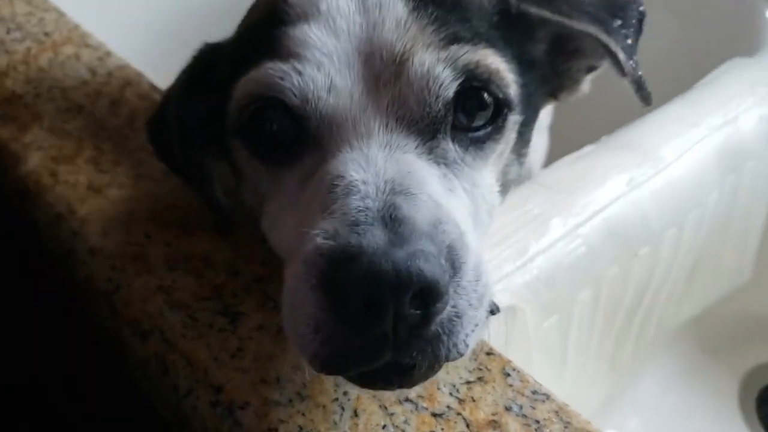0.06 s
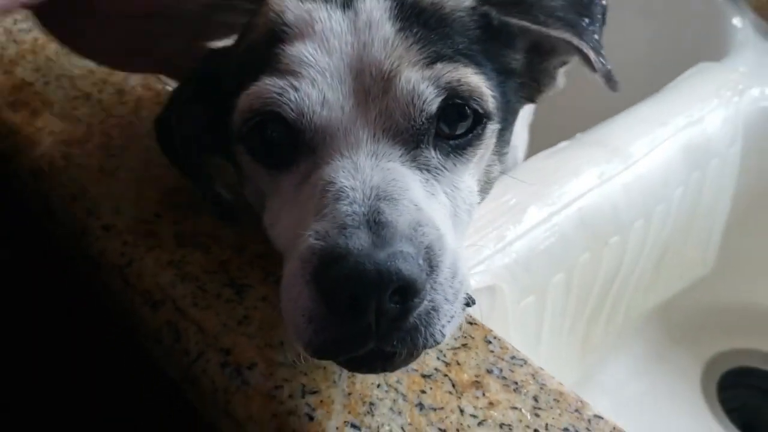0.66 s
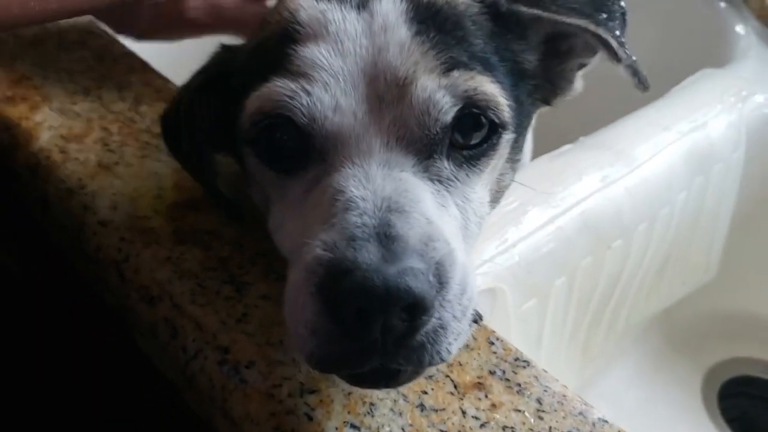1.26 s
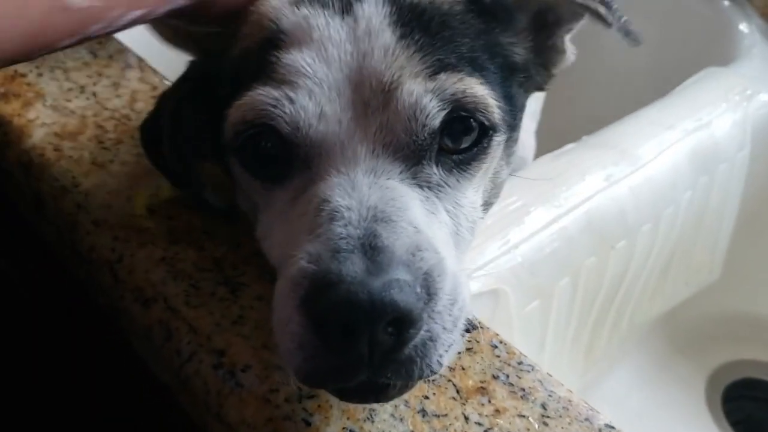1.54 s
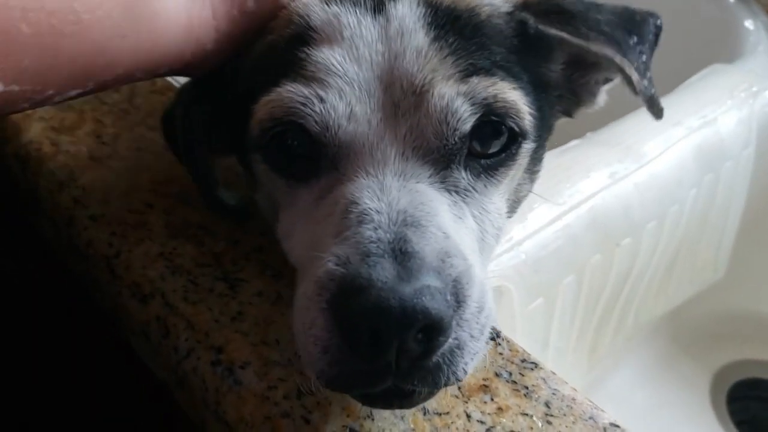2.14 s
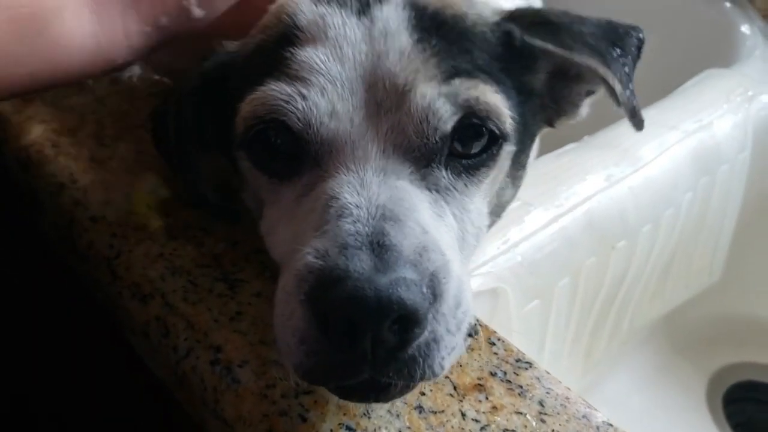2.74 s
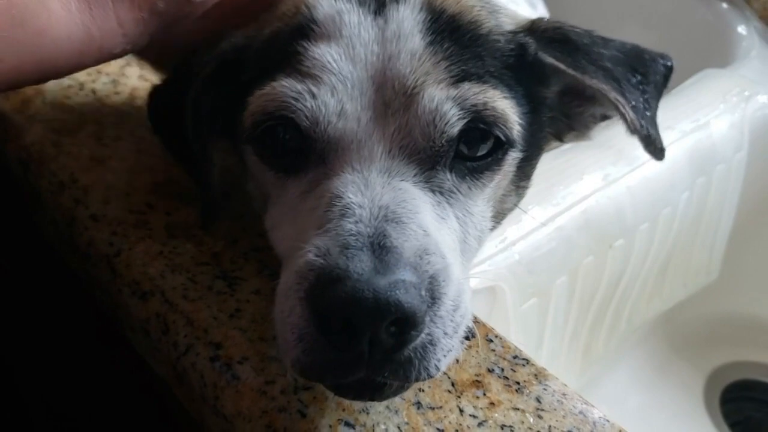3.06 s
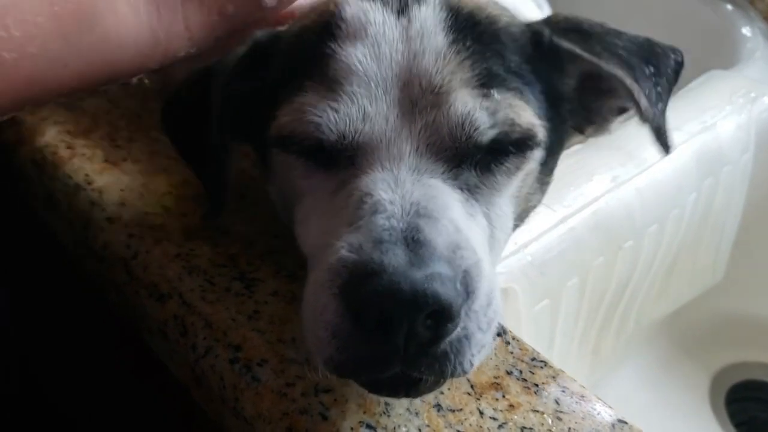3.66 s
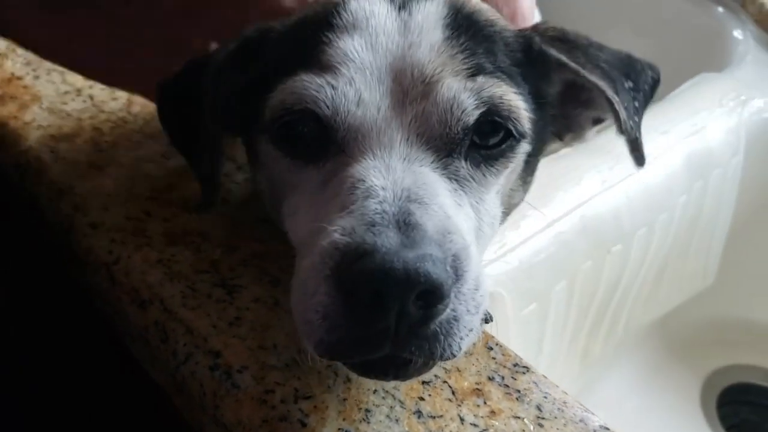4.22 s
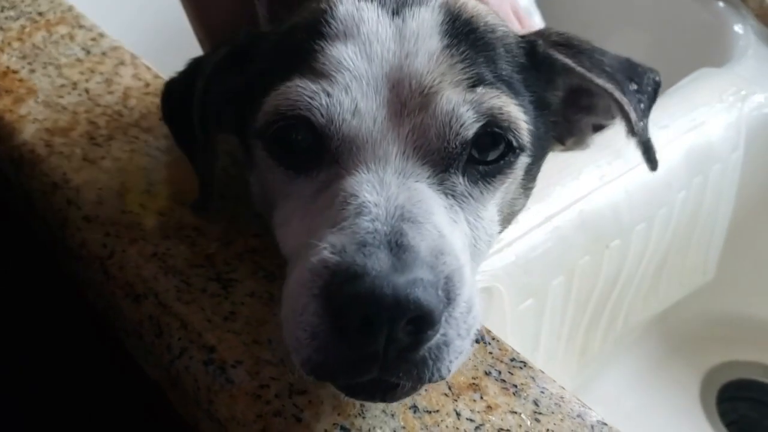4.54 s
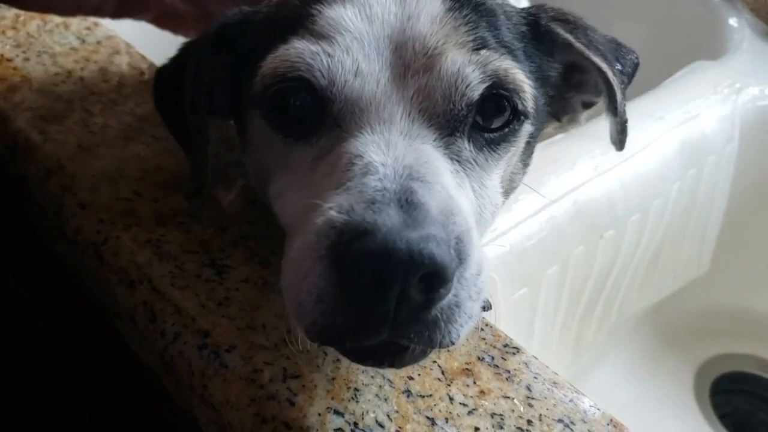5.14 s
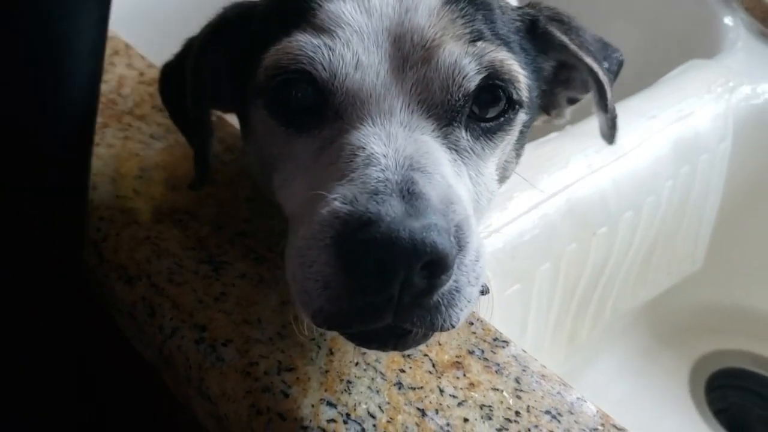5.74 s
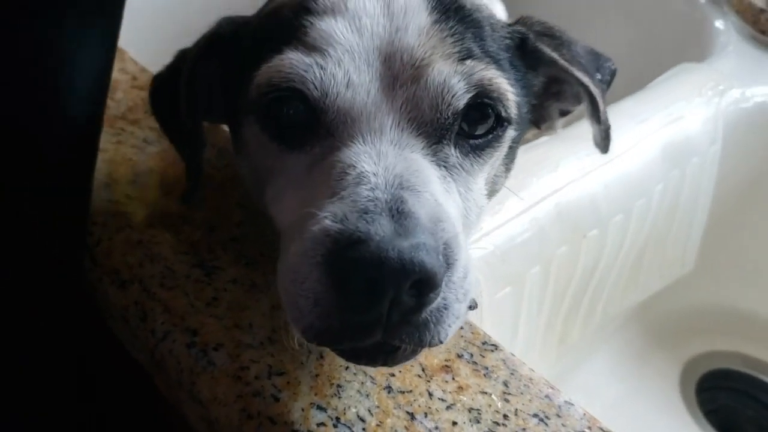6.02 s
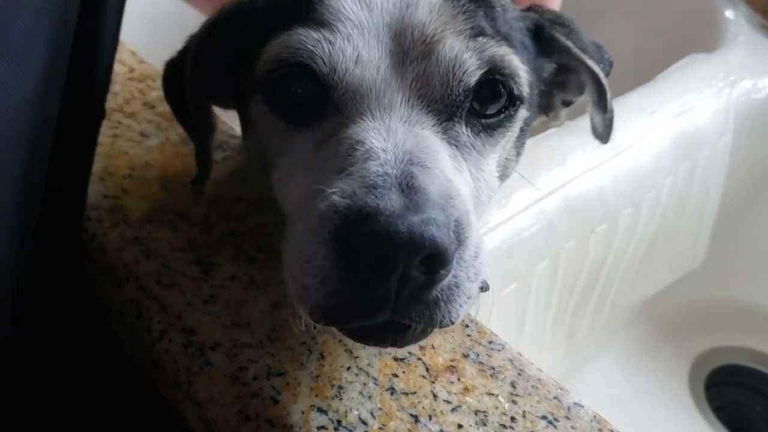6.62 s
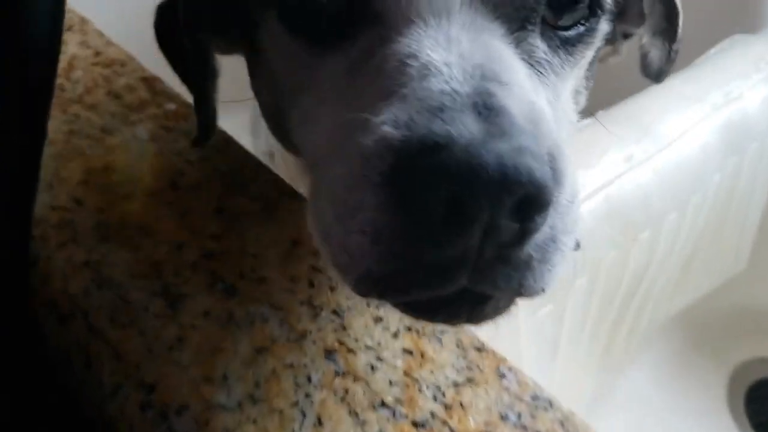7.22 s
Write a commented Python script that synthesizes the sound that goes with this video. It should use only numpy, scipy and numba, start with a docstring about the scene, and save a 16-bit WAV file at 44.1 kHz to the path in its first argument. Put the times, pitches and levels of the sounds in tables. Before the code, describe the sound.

Hands scrub lather into a wet dog in a kitchen sink, close to the microphone and mostly on the left. Each short, uneven stroke brings a hiss of wet fur, a fine fizz of bubbles and a small squelch. A low motor hum and fan drone continue throughout.

The first half second has firm rubbing, soft sink bumps and a hollow knock. Strokes continue with brief fingertip rasps, growing lighter from about 2 to 3.7 seconds, with small wet pats near 2.5 and 3.2. Firmer rubbing returns at 3.9. At 4.2 comes the loudest moment: a wet slap with a knock, a bright tick and a dull sink thud. Smaller wet snaps follow at 4.7 and 5.3. Around 6.3 the dog bumps the sink with a short, low rumble. Scrubbing goes on to about 7.5 seconds, with a light knock near 7.2. The room echo is short and faint.

```python
"""Two hands scrub lather into a wet dog standing in a kitchen sink, close to the microphone.
With each stroke, wet hairs slip past the fingers and hiss, tiny bubbles burst and fizz, and air
pockets squelch under the palms. Now and then a hand pats or knocks the coat, a film of water tears
with a tick, or the dog bumps the tub. Behind it all hum the motor and fan of a kitchen appliance."""
import sys
import numpy as np
from scipy import signal
from scipy.fft import rfft, irfft, next_fast_len
from scipy.io import wavfile
from scipy.ndimage import uniform_filter1d, map_coordinates
from numba import njit

SR = 44100
rng = np.random.default_rng(int(sys.argv[2]) if len(sys.argv) > 2 else 0)


def transcribe(signal):
    """Save signal, clipped to [-1, 1], as a 16-bit WAV file at the path in sys.argv[1]."""
    frames = np.atleast_2d(signal).T
    limited = np.clip(frames, -1, 1)
    pcm = np.round(limited * 32767).astype(np.int16)
    wavfile.write(sys.argv[1], SR, pcm)


N = 329868

# How long the kitchen's echo takes to fade by 60 dB: f/Hz, decay/s
ECHO_DECAY = [(200, 0.27), (2000, 0.28), (12000, 0.043)]
# The tones of the appliance's motor: f/Hz, relative level/dB
MOTOR_TONES = [(58.5, -49.5), (56.06, -59.5), (63, -64), (291.2, -58.5)]
# The fan's colour (how strong each frequency is), shaped by the room: f/Hz, level/dB
FAN_COLOUR = [(25, -65), (70, -11.5), (130, -12), (152, -6.5), (171, 5.5), (183, 6.5), (197, -1.5),
              (207, -9.5), (285, -13), (365, -15.5), (470, -43), (1500, -66)]
# How loud the appliance is: t/s, motor gain/dB, fan level/dB
APPLIANCE_LEVELS = [(4.5, -2.5, -47.5), (5.3, -5.5, -46)]
# How alike left and right are for the distant fan: f/Hz, likeness (1 = the same)
FAR_LIKENESS = [(60, 0.12), (180, 0.97), (400, 0.67), (1000, .1)]
# The same for sounds close by: f/Hz, likeness
NEAR_LIKENESS = [(100, .9), (400, .75), (800, .6), (1400, .35), (3000, .2), (6500, .05), (8400, .7),
                 (10000, .35), (12000, .5), (15500, .35)]
# The dog bumps the tub: t/s, level/dB, f/Hz
TUB_BUMPS = [(.10, -36.5, 70), (0.157, -35, 78), (0.357, -34, 119), (4.228, -21, 164), (4.668, -29.5, 168),
             (6.274, -23.5, 81), (6.458, -31, 77)]
# The dog shifts its weight and the tub rumbles: t/s, length/s, level/dB
WEIGHT_SHIFTS = [(.09, 0.41, -55), (6.265, 0.18, -43.5)]
# Hollow knocks of a hand on the dog: t/s, level/dB, f/Hz
HAND_KNOCKS = [(0.158, -27, 400), (0.397, -30, 750), (0.426, -20, 850), (3.236, -32, 980),
               (3.429, -34, 1010), (4.173, -30, 426), (4.232, -17.5, 1000), (5.347, -31.5, 650),
               (7.201, -29, 950)]
# The water film tears: t/s, level/dB, f/Hz
FILM_CRACKS = [(2.806, -28.5, 5600), (4.2333, -16, 3950), (4.8, -27.5, 7000)]
# Wet pats, each part on its own scale: t/s, splat level/dB, snap level/dB
WET_PATS = [(0.159, -32, -26), (1.796, -32, -30), (2.469, -26, -25), (2.514, -33, -34), (2.698, -28.5, -35),
            (3.188, -25, -19), (4.2271, -15.5, -23), (4.233, -22.5, -14), (4.302, -22.5, -18.5),
            (4.669, -27, -11), (4.69, -33, -12), (5.317, -33, -19)]
# Colour of a pat's cupped splat: f/Hz, level/dB
SPLAT_COLOUR = [(300, -10.5), (700, -4.5), (980, 2), (1140, 15), (1300, 2.5), (1900, -1.5), (2400, -22.5),
                (6000, -14), (16000, -50)]
# Colour of a pat's bright snap: f/Hz, level/dB
SNAP_COLOUR = [(1200, -32), (2400, -6), (2950, 6), (3600, -3), (4300, -17), (6000, -19), (15000, -21.5)]
# Fingertips rasp across the lie of the coat: t/s, length/s, level/dB
FINGER_RASPS = [(0.86, 0.026, -41.5), (1.405, 0.05, -49.5), (1.645, 0.038, -46), (1.945, 0.04, -41.5),
                (2.15, 0.071, -48.5), (2.41, 0.042, -48.5), (3.17, 0.025, -53), (3.67, 0.053, -51),
                (4.52, 0.03, -49.5)]
# Colour of dragged skin: f/Hz, level/dB
SKIN_COLOUR = [(120, -10), (230, 0.5), (380, -5.5), (550, -2.5), (800, 0), (1100, -3.5), (2000, -35)]
# Where the squeezing hand works: t/s, left minus right/dB
HAND_BALANCE = [(0.1, 2.5), (0.7, 9), (1.45, 7), (1.8, 3), (2.7, 2), (3.15, 8), (4.1, 6.5), (4.6, 1),
                (7.2, 4.5)]
# Colour of bursting lather bubbles: f/Hz, level/dB
FIZZ_COLOUR = [(1600, -35), (2350, -9.5), (3050, -6.5), (4100, -11.5), (5000, -1.5), (6300, -2.5),
               (7600, -2.5), (8400, -4.5), (10300, -2.5), (11800, 0.5), (13000, -2), (15700, -1.5)]
# The fizz leans to the left: f/Hz, left minus right/dB
FIZZ_BALANCE = [(2300, 9), (3050, 2), (4200, 12.5), (7200, 10), (8400, 2.5), (10200, 3), (12000, 1.5),
                (15500, 0)]
# The lather shifts sideways as the hands move: t/s, position (higher = farther left)
LATHER_PATH = [(0.0, 3), (2.27, -3), (3.0, 7.5), (3.79, -1.5), (3.85, 16), (4.12, -7), (4.56, 5),
               (4.69, -9), (4.92, -1.5), (7.19, 0.5)]
# Colour of rubbed wet hair: f/Hz, level/dB
HAIR_COLOUR = [(150, -3), (370, -7), (650, -12), (1250, -3), (1880, 1), (2400, -5.5), (3400, 1.6),
               (4300, 0), (7200, 0), (8100, -13), (11000, -8), (16000, -3.5)]
# The scrubbing strokes, each layer's level on its own scale:
# t/s, length/s, hair level/dB, fizz level/dB, suds level/dB, air pocket f/Hz, skin level/dB
HAND_STROKES = [(0.0, 0.075, -29.5, -35, -41.5, 1450, -55.5), (0.11, 0.097, -39.5, -55, -45, 1460, -56),
                (0.225, 0.18, -32, -40.5, -38, 1800, -48.5), (0.539, 0.19, -37.5, -47, -44.5, 1750, -64),
                (0.787, 0.12, -35.5, -41, -40.5, 1650, -66), (0.938, 0.061, -42, -42, -45.5, 1720, -75),
                (1.015, 0.17, -33, -42, -38.5, 1780, -53.5), (1.384, 0.048, -36.5, -44, -44.5, 1800, -64),
                (1.504, 0.11, -42.5, -47, -49.5, 1710, -65), (1.636, 0.09, -38, -46.5, -43, 1630, -63),
                (1.928, 0.039, -35, -38, -41, 1500, -60.5), (2.037, 0.035, -44, -60, -44, 1290, -79),
                (2.13, 0.046, -45.5, -43.5, -40, 1210, -85), (2.2, 0.13, -41.5, -49, -49, 1440, -76),
                (2.388, 0.034, -38.5, -44, -42, 1570, -60), (2.46, 0.021, -68, -59, -46, 1000, -61),
                (2.677, 0.045, -41.5, -45.5, -46, 1320, -70), (2.79, 0.043, -47.5, -53, -74, 1490, -80),
                (2.925, 0.21, -47.5, -48, -59, 1420, -70), (3.143, 0.02, -39, -44, -41, 1500, -63),
                (3.304, 0.033, -74, -47.5, -82, 1370, -86), (3.45, 0.15, -55, -46, -51.5, 1320, -80),
                (3.598, 0.031, -38.5, -41, -60, 1340, -76), (3.69, 0.069, -56, -47, -83, 1420, -69),
                (3.863, 0.3, -33, -42, -39.5, 1720, -48.5), (4.171, 0.16, -34.5, -40.5, -36.5, 1660, -52.5),
                (4.454, 0.098, -44, -42.5, -73, 1460, -67), (4.64, 0.09, -42, -47.5, -48.5, 1240, -61),
                (4.746, 0.25, -44.5, -46.5, -52.5, 1330, -59), (4.95, 0.057, -40.5, -49, -52, 1320, -64),
                (5.026, 0.067, -40, -40.5, -41, 1110, -69), (5.13, 0.26, -41, -47, -48, 1340, -60.5),
                (5.443, 0.21, -40, -47, -48.5, 1130, -54.5), (5.705, 0.27, -52, -58, -55.5, 1280, -65),
                (5.846, 0.16, -37, -46.5, -47, 1390, -51), (5.953, 0.031, -47, -44, -42, 1210, -50.5),
                (6.169, 0.14, -35.5, -44.5, -46, 1360, -55), (6.334, 0.14, -34, -42, -40.5, 1570, -49),
                (6.482, 0.31, -37.5, -46.5, -44.5, 1400, -54.5),
                (6.79, 0.19, -42.5, -48, -51.5, 1350, -59.5), (7.028, 0.15, -36, -46, -47, 1410, -58),
                (7.126, 0.11, -46, -53, -45, 1270, -49.5), (7.382, 0.4, -49.5, -50.5, -46, 1430, -57.5)]


def amp(db):
    """Turn decibels into a gain to multiply by."""
    return 10 ** (np.asarray(db) / 20)


def unit(x):
    """Scale a signal to an average power of 1."""
    return x / np.sqrt(np.mean(x ** 2) + 1e-20)


def along(points, hz):
    """Read between the rows of a (frequency, value) table, on a log frequency axis."""
    f, v = np.transpose(points)
    return np.interp(np.log(hz + 1), np.log(f + 1), v)


def curves(rows):
    """Turn each column after the time into one value per sample."""
    times, *columns = np.transpose(rows)
    return [np.interp(np.arange(N) / SR, times, column) for column in columns]


def wobble(rate):
    """A wandering curve that joins `rate` random points a second."""
    points = rng.standard_normal(int(N * rate / SR) + 4)
    return map_coordinates(points, [np.arange(N) * rate / SR], order=1)


def swells(rows, attack_s, release_s):
    """A gain that rises, holds and fades for each (start, length, level) row."""
    t = np.arange(N) / SR
    return sum(amp(db) * (1 + np.tanh((t - start) / attack_s)) / 2
               * np.exp(-np.maximum(t - start - length, 0) / release_s) for start, length, db in rows)


def filtered(x, response):
    """Multiply each frequency in x by response(hz)."""
    size = next_fast_len(N + SR // 2)
    return irfft(rfft(x, size) * response(np.fft.rfftfreq(size, 1 / SR)), size)[..., :N]


def coloured(x, colour):
    """Give x a colour and an average power of 1."""
    return unit(filtered(x, lambda hz: amp(along(colour, hz))))


def ringing(x, colour, size=4096):
    """Make each hit in x ring with a colour."""
    cepstrum = irfft(np.log(amp(along(colour, np.fft.rfftfreq(size, 1 / SR)))))
    cepstrum[1:size // 2] *= 2  # folding it puts the ring after the hit, never before
    cepstrum[size // 2 + 1:] = 0
    response = irfft(np.exp(rfft(cepstrum)))
    return signal.fftconvolve(x, response[None] / np.abs(response).max(), axes=1)[:, :N]


@njit
def hollow(x, hz, width, rate):
    """Ring x like a small hollow whose pitch and width can change at every sample."""
    out = np.zeros_like(x)
    for row in range(len(x)):
        low = band = 0.
        for i in range(x.shape[1]):
            step = 2 * np.sin(np.pi * hz[i] / rate)
            low += step * band
            band += step * (x[row, i] - low - band * width[i] / hz[i])
            out[row, i] = band * width[i] / hz[i]
    return out


def crackle(colour, rate, spread_db, hiss):
    """Two unrelated rows of tiny, uneven ticks, about `rate` a second, mixed with smooth hiss."""
    ticks = (rng.random((2, N)) < rate / SR) * rng.choice([-1, 1], (2, N))
    sizes = amp(spread_db * np.minimum(rng.exponential(size=(2, N)), 4))
    return coloured(unit(ticks * sizes) + hiss * rng.standard_normal((2, N)), colour)


def flutter(x, depth_db):
    """Make the level flicker in patches about 1.5 kHz wide and 30 ms long."""
    bands = signal.stft(x, nperseg=256)[2]
    patches = uniform_filter1d(rng.standard_normal(bands.shape[1:]), size=9, axis=0)
    patches = unit(uniform_filter1d(patches, size=10, axis=1))
    return unit(signal.istft(bands * amp(depth_db * patches), nperseg=256)[1][:, :N])


def placed(pair, likeness, balance, lead_s=0):
    """Mix two unrelated signals into left and right; the left comes lead_s sooner."""
    def blend(hz):
        angle = np.arccos(np.clip(along(likeness, hz), -1, 1)) / 2
        return np.array([np.cos(angle), np.sin(angle)])

    def sides(hz):
        lean = amp(along(balance, hz) / 2) * np.exp(1j * np.pi * hz * lead_s)
        return np.array([lean, 1 / lean]) / np.sqrt((abs(lean) ** 2 + abs(lean) ** -2) / 2)

    mid, side = filtered(pair, blend)
    return filtered(np.array([mid + side, mid - side]), sides)


def pan(side_db):
    """Left and right gains that lie side_db apart and keep the total power."""
    gains = amp(side_db * np.array([[.5], [-.5]]))
    return gains / np.sqrt(np.mean(gains ** 2, axis=0))


def kitchen_echo(x):
    """The kitchen answers with a short echo that dies sooner in the treble."""
    hz, t, bands = signal.stft(rng.standard_normal((2, SR // 2)), SR, nperseg=256)
    tail = signal.istft(bands * amp(-60 * t / along(ECHO_DECAY, hz)[:, None]), SR, nperseg=256)[1]
    return signal.fftconvolve(x, tail / np.linalg.norm(tail[0]), axes=1)[:, :N]


def appliance():
    """A motor hums with slightly unsteady tones while a fan drones."""
    t = np.arange(N) / SR
    motor = sum(amp(db) * np.sqrt(2) * np.sin(2 * np.pi * (hz * t + rng.random()) + 0.037 * wobble(2.1))
                for hz, db in MOTOR_TONES)
    air = coloured(rng.standard_normal((2, N)), FAN_COLOUR)
    fan = placed(air, FAR_LIKENESS, balance=[(60, 3.7), (200, 1.7), (400, 7.6)])
    motor_db, fan_db = curves(APPLIANCE_LEVELS)
    return amp(motor_db) * motor + amp(fan_db + 3.2 * wobble(8.7)) * fan


def tub_bumps(decay_s=0.14, attack_s=0.014):
    """The tub takes the dog's weight with a low tone and a shudder, and rumbles as the dog shifts."""
    t = np.arange(SR // 3) / SR
    tone, shudder = np.zeros((2, N + SR))
    for start, db, hz in TUB_BUMPS:
        fade = amp(db - 60 * t / decay_s) * (1 - np.exp(-t / attack_s))
        tone[round(start * SR):][:len(t)] += fade * np.sin(2 * np.pi * hz * t)
        shudder[round(start * SR):][:len(t)] += fade
    rumble = coloured(rng.standard_normal(N), [(35, -17), (80, 0.5), (260, -7.5), (500, -19), (2000, -44)])
    shifting = swells(WEIGHT_SHIFTS, attack_s=0.013, release_s=0.037)
    return tone[:N] + (amp(-6) * shudder[:N] + shifting) * rumble


def hand_knocks(decay_s=0.054, relative_width=0.42, size=4096):
    """A hand meets the soaked body: one push and a short shudder make a dull, hollow ring."""
    t, hz = np.arange(size) / SR, np.fft.rfftfreq(size, 1 / SR)
    out = np.zeros((2, N + size))
    for start, db, pitch_hz in HAND_KNOCKS:
        push = 0.11 * rng.standard_normal((2, size)) * amp(-60 * t / decay_s)
        push[0, 0] += 1
        band = 1j * hz * pitch_hz * relative_width
        ring = band / (pitch_hz ** 2 - hz ** 2 + band)
        knock = irfft(rfft(push) * ring / (1 + 1j * hz / (2 * pitch_hz)))  # with softened treble
        out[:, round(start * SR):][:, :size] += amp(db) * knock / np.abs(knock).max()
    return out[:, :N]


def film_cracks(decay_s=0.0058, relative_width=0.38, size=2048):
    """The water film tears with a short, bright tick."""
    t, hz = np.arange(size) / SR, np.fft.rfftfreq(size, 1 / SR)
    out = np.zeros(N + size)
    for start, db, pitch_hz in FILM_CRACKS:
        band = hz * pitch_hz * relative_width
        ring = band / np.hypot(pitch_hz ** 2 - hz ** 2, band)
        tear = irfft(rfft(rng.standard_normal(size)) * ring) * amp(-60 * t / decay_s)
        out[round(start * SR):][:size] += amp(db) * tear / np.abs(tear).max()
    return out[:N]


def wet_pats(spatter_s=0.065, size=3000):
    """A palm meets the soaked coat: a cupped splat and a snap, trailed by spatter."""
    t = np.arange(size) / SR
    blows = np.zeros((2, 2, N + size))
    for start, splat_db, snap_db in WET_PATS:
        blow = 0.074 * rng.standard_normal((2, 2, size)) * amp(-60 * t / spatter_s)
        blow[:, 0, 0] += 1  # the hit itself
        gains = amp(splat_db + np.array([-2, snap_db + 17.5]))  # the snap is set against the splat
        blows[:, :, round(start * SR):][:, :, :size] += blow * gains[:, None, None]
    splats, snaps = blows[:, :, :N]
    return ringing(splats, SPLAT_COLOUR) + ringing(snaps, SNAP_COLOUR)


def finger_rasps():
    """Hairs flick off the fingertips in quick ticks and ring the narrow, shifting gap beneath them."""
    ticks = crackle([(3000, 0)], rate=1000, spread_db=1, hiss=0.44)
    pitch_hz, width_hz = 3040 * amp(0.3 * wobble(13)), np.full(N, 690)
    gap = unit(hollow(hollow(ticks, pitch_hz, width_hz, SR), pitch_hz, width_hz, SR))
    return swells(FINGER_RASPS, attack_s=0.0064, release_s=0.017) * gap


def stroke_level(levels_db, idle_db, attack_s, release_s, arch_db, lag_s=0, lean_db=0):
    """One layer's level in dB: it swells with each stroke, and the hands never quite rest."""
    t = np.arange(N) / SR
    power = np.full(N, amp(idle_db) ** 2)
    for (start, length, *_), db in zip(HAND_STROKES, levels_db):
        near = slice(*np.searchsorted(t, [start - .5, start + length + .5]))
        age = t[near] - start - lag_s
        rise = (1 + np.tanh(age / attack_s / 2)) / 2
        fall = np.exp(-(np.maximum(age - length, 0) / release_s) ** 0.96)
        progress = np.clip(age / length, 0, 1)
        # the hand leans in as it goes, and is fastest in mid-stroke
        shape_db = lean_db * (progress - .5) + arch_db * (np.sin(np.pi * progress) - .5)
        power[near] += (amp(db + shape_db) * rise * fall) ** 2
    return 10 * np.log10(power)


def hand_levels():
    """The same strokes drive hair, fizz, suds and skin; the palm presses just after the fingers slide."""
    _, _, hair, fizz, suds, _, skin = np.transpose(HAND_STROKES)
    rub = dict(attack_s=0.025, release_s=0.093, arch_db=1.5)
    squeeze = dict(attack_s=0.013, release_s=0.048, arch_db=1, lag_s=0.0096)
    return (stroke_level(hair, idle_db=-61, **rub),
            stroke_level(fizz, idle_db=-53, **rub),
            stroke_level(suds, idle_db=-68, **squeeze),
            stroke_level(skin, idle_db=-65, lean_db=6, **squeeze))


def at_hand(pair, lead_s_per_db=0.00003):
    """The farther left the hand is, the louder and sooner it sounds on the left."""
    t = np.arange(N) / SR
    side_db, = curves(HAND_BALANCE)
    shift_s = lead_s_per_db * side_db / 2
    return pan(side_db) * np.array([np.interp(t + shift_s, t, pair[0]), np.interp(t - shift_s, t, pair[1])])


def tub_wall(x, share, delay_s):
    """A quick echo off the tub wall lifts some frequencies and dips others, sliding as the hand moves."""
    t = np.arange(N) / SR
    dull = filtered(x, lambda hz: 1 / (1 + (hz / 6000) ** 4))
    echo_t = t - delay_s * amp(0.55 * wobble(6))
    echo = np.array([np.interp(echo_t, t, row) for row in dull])
    return (x + share * echo) / np.sqrt(1 + share ** 2 / 2)


def skin_drag(press_db):
    """Under a firm hand the loose skin sticks and slips with a low, coarse scuff."""
    return amp(press_db + 2.5) * crackle(SKIN_COLOUR, rate=500, spread_db=4, hiss=0.46)


def pocket_pitch(fall=0.04):
    """The air pockets sink in pitch through each stroke and glide on to the next."""
    points = [(start + length * progress, hz * (1 - fall * (progress - .5)))
              for start, length, _, _, _, hz, _ in HAND_STROKES for progress in (0, 1)]
    return curves(sorted(points))[0]


def suds_squelch(level_db, press_db):
    """Air pockets burst in the hollow under the palm, whose pitch moves as the hand cups and flattens."""
    bursts = crackle([(300, -7), (1050, 3.5), (1900, 0.5), (2350, -1.5), (6000, 4)],
                     rate=1800, spread_db=3.5, hiss=0.52)
    pitch_hz = pocket_pitch() * amp(0.56 * wobble(70))
    # a flat, firm palm damps the hollow, so it rings over a wider band
    width_hz = np.interp(press_db, [-76, -63, -48], [260, 650, 1500])
    cupped = hollow(hollow(bursts, pitch_hz, width_hz, SR), pitch_hz, width_hz, SR)
    cupped = unit(cupped / np.sqrt(width_hz))
    bright = crackle([(2450, -9), (2950, 6.5), (3500, -13), (4100, 4), (9000, -57)],
                     rate=700, spread_db=2, hiss=0.94)
    return amp(level_db - 1.18 + wobble(60)) * (cupped + amp(-8.5) * bright)


def lather_fizz(level_db, grip, wall_share):
    """Tiny lather bubbles burst all over the coat, shifting from side to side with the hands."""
    bubbles = crackle(FIZZ_COLOUR, rate=5500, spread_db=2.5, hiss=0.9)
    bubbles = tub_wall(flutter(bubbles, depth_db=2.4), wall_share, delay_s=0.000594)
    fizz = amp(level_db + 6 + grip + 0.68 * wobble(30)) * bubbles
    position, = curves(LATHER_PATH)
    return pan(side_db=0.69 * position - 3.5) * placed(fizz, NEAR_LIKENESS, FIZZ_BALANCE)


def hair_rub(level_db, grip, wall_share):
    """Wet hairs slip past the fingers on the left, and their countless ticks merge into a hiss."""
    ticks = crackle(HAIR_COLOUR, rate=5000, spread_db=3.5, hiss=0.94)
    ticks = tub_wall(flutter(ticks, depth_db=1.8), wall_share, delay_s=0.000629)
    rub = amp(level_db - 2.5 + 0.79 * grip) * ticks
    return placed(rub, likeness=[(400, 0.29), (2000, 0.07)], balance=[(400, 5.7), (2000, 9.7), (4000, 26)])


def scene():
    """The hands scrub close by and to the left; the appliance hums farther off."""
    hair_db, fizz_db, suds_db, press_db = hand_levels()
    squelch = suds_squelch(suds_db, press_db) + skin_drag(press_db) + finger_rasps() + wet_pats()
    squelch = placed(squelch, NEAR_LIKENESS, balance=[(1000, 0)], lead_s=0.00021)
    knocks = placed(hand_knocks(), likeness=[(1000, 0.82)], balance=[(1000, 4.8)], lead_s=0.0005)
    handling = at_hand(squelch) + knocks + film_cracks()
    grip = wobble(45)  # the fingers catch and slip on tufts
    # quieter strokes lie deeper in the tub, where its wall colours them more
    wall_share = np.clip((-36 - hair_db) / 20, .1, .55)
    coat = hair_rub(hair_db, grip, wall_share) + lather_fizz(fizz_db, grip, wall_share / 2)
    return coat + handling + amp(-14.5) * kitchen_echo(handling) + tub_bumps() + appliance()


def record(dry, top_hz=15900):
    """Cut away the very highest treble."""
    return filtered(dry, lambda hz: hz < top_hz)


dry = scene()
out = record(dry)
transcribe(out)
```